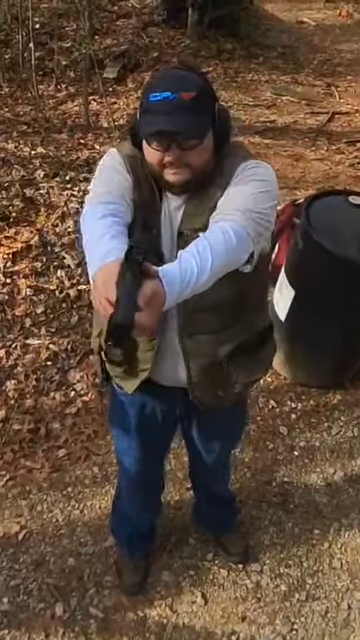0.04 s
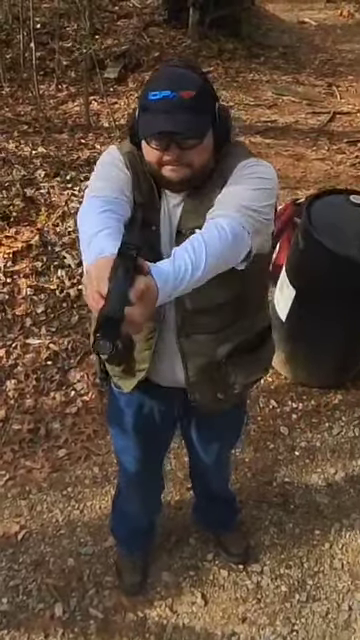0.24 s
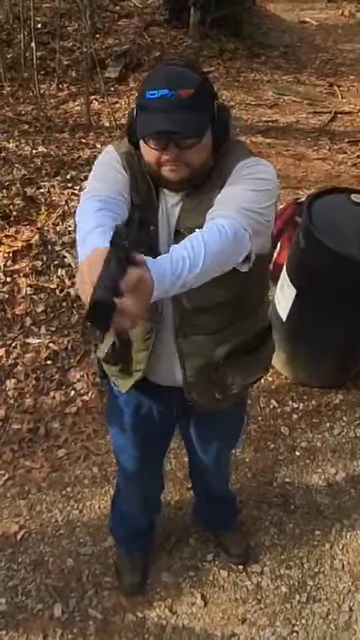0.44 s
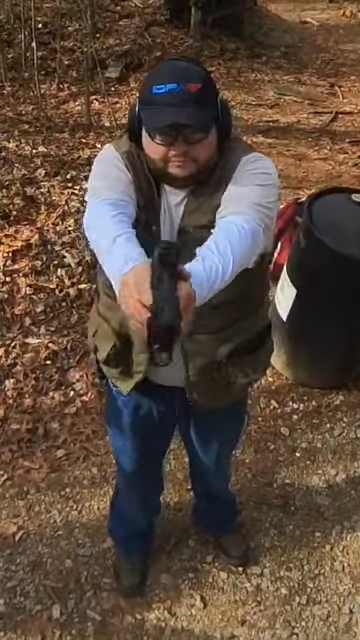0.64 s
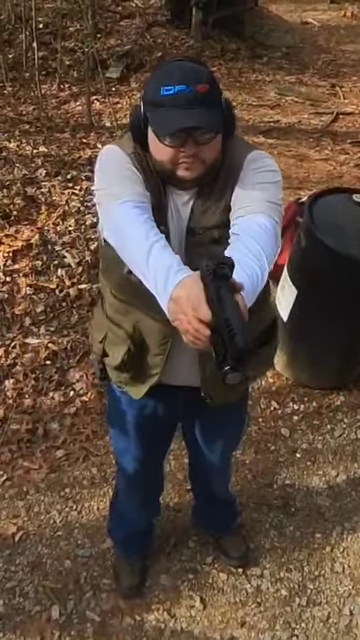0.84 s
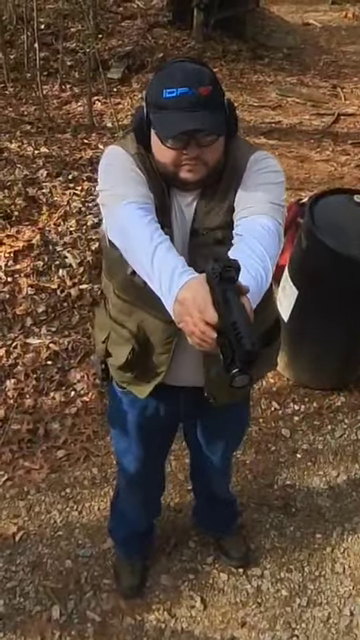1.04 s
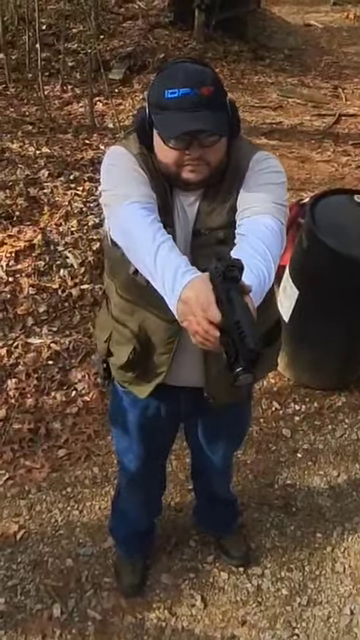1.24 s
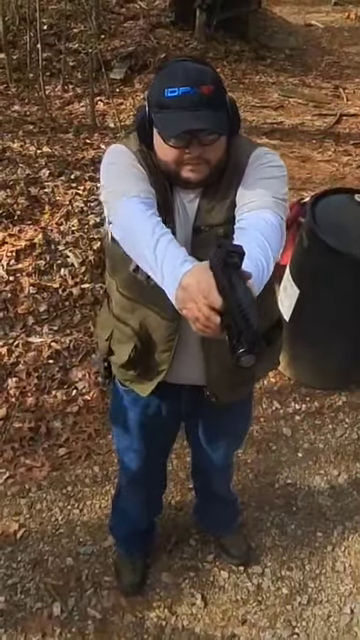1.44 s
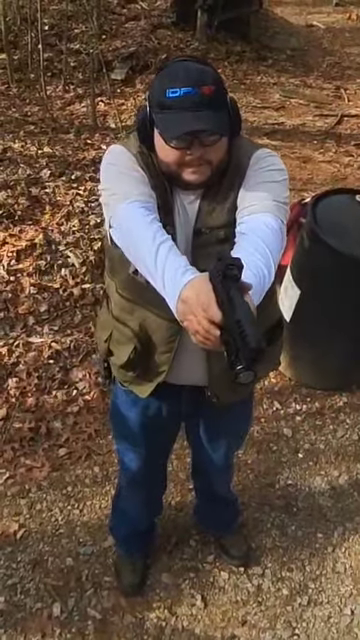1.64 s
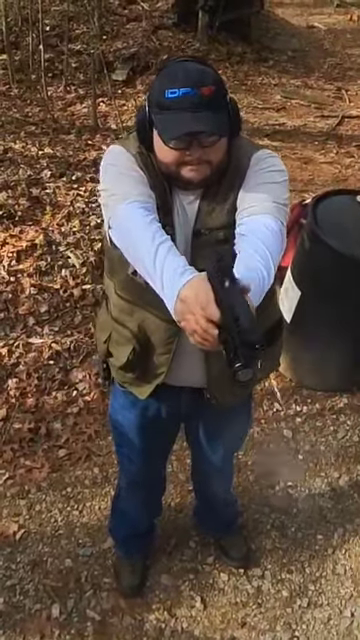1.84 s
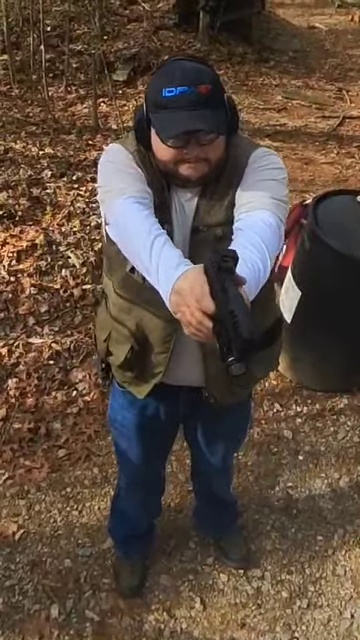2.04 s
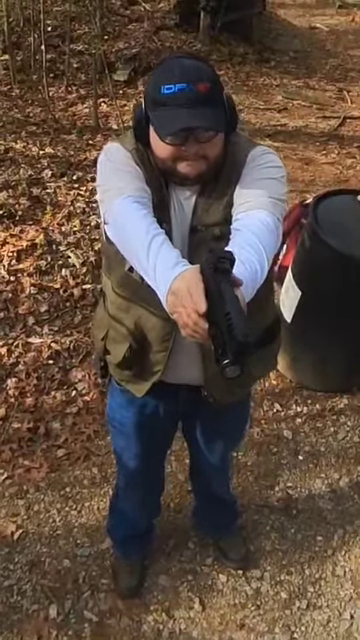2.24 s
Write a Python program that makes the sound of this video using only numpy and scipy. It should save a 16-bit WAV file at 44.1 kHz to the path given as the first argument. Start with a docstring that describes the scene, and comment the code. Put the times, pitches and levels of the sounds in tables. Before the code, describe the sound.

Four close handgun shots in a wood clearing, two quick, then two more after a pause; each a clipped double knock, a dip to near silence, then a low roar from the trees, with faint ticks.

```python
"""A wood clearing, where four handgun shots go off close to a small camera whose input each blast swamps. With
each shot come two knocks about 20 ms apart: sharp bumps that start a low, dying ring, amid faint pips and
snaps. The background drops away to a gap of near silence, then the roar scattered back by the trees comes in,
made of tinted noise with a boom and a bright hiss. Faint ticks, louder on one side, are short bursts of noise
with fainter, longer tails. Faint outdoor air, also tinted noise, lies underneath."""
import sys
import numpy as np
from scipy import signal
from scipy.fft import rfft, irfft
from scipy.io import wavfile
from scipy.ndimage import uniform_filter1d

SR = 44100
rng = np.random.default_rng(int(sys.argv[2]) if len(sys.argv) > 2 else 0)


def store_pcm(level_fs):
    """Save levels as 16-bit WAV."""
    pcm = np.round(np.clip(level_fs, -1, 1) * 32767).astype(np.int16)
    wavfile.write(sys.argv[1], SR, np.atleast_2d(pcm).T)


def invert_db(level):
    """Linear amplitude ratio for a level in decibels (20 dB per decade), elementwise."""
    return 10 ** (np.asarray(level, dtype=float) / 20)


N = 101429
T = np.arange(N) / SR  # time of every sample, s

# Tint of the outdoor air: f/Hz, relative level/dB
AIR_TINT = [(12, -33), (20, -4.5), (54, 2), (70, 3), (97, -8), (137, -5), (446, -15), (483, -15),
            (895, -15.5), (1570, -35), (7220, -40), (8700, -54.5), (12000, -51), (15600, -76),
            (22000, -120)]
# The four shots: t of the main knock/s, level of the echo's hiss/dB, time for the hiss to fall 60 dB/s
SHOTS = [(0.2612, -37, 0.41), (0.5648, -90, 0.19), (1.4858, -48.5, 0.23), (2.0166, -63, 0.14)]
# Faint pips around every shot: t after the main knock/s, level/dB, width/s
PIPS = [(-.04, -30, 0.00011), (.02, -30, 0.00017), (.0352, -21.5, 0.00029), (.0393, -33, 0.00013),
        (.0592, -41.5, .0002), (.076, -55, 0.00033)]
# Single knocks, two to a shot: t/s, knock level/dB, ring level/dB, crackle level/dB, whistle level/dB
KNOCKS = [(0.2404, -0.5, -4.5, -19, -25), (0.2606, 0.5, -3, -16.5, -49), (0.544, -13.5, 5.5, -50, -46),
          (0.5637, 1.5, 0.5, -48.5, -47), (1.466, -5.5, 2, -38, -43), (1.486, -0.3, 0.5, -21, -51.5),
          (1.9969, -7, 1, -37.5, -45), (2.0166, -0.5, 0, -37.5, -48.5)]
# Two ring tones that start downwards, as suction: f/Hz, level/dB, time to fall 60 dB/s
SUCTION_TONES = [(44, -9.3, .095), (180, -5, .035)]
# The ring tone that starts upwards: f/Hz, level/dB, time to fall 60 dB/s
PUNCH_TONE = (152, 6.7, .0168)
# The last faint ring tone: f/Hz, level/dB, time to fall 60 dB/s
LINGERING_TONE = (190, -23, 0.11)
# Lower and upper edge of the crackle: f/Hz
CRACKLE_BAND = (1900, 13100)
# Thin snaps: t/s, level/dB
SNAPS = [(0.2484, -30.5), (0.5503, -31), (1.4681, -14.5), (1.9982, -22.5), (0.289, -39.5), (.6083, -52),
         (1.4763, -58.5), (1.495, -48), (1.5103, -47.5), (1.5288, -46.5), (2.0248, -49), (2.0386, -55),
         (2.0595, -62.5)]
# Tint of the roar from the trees: f/Hz, relative level/dB
ROAR_TINT = [(15, -38), (25, -65), (43, -47), (70, -35.5), (102, -14.5), (133, -23.5), (324, -3.5),
             (678, -1.5), (1190, -5), (1730, -20.5), (2050, -19), (4190, -33.5), (9000, -64.5),
             (11700, -89), (19800, -120)]
# Loudness of the roar, one list for each shot: t/s, level/dB
ROAR_LEVELS = [
    [(0.395, -25.5), (0.423, -26), (0.431, -26), (0.54, -27)],
    [(0.705, -26.5), (0.749, -29), (1.297, -26.5), (1.311, -28.5), (1.451, -29), (1.46, -37.5)],
    [(1.62, -28), (1.676, -35), (1.686, -30.5), (1.832, -31), (1.836, -29), (1.99, -28)],
    [(2.15, -26.5), (2.208, -34.5), (2.214, -32), (2.3, -29.5)],
]
# Tint of the echo's boom: f/Hz, relative level/dB
BOOM_TINT = [(12, -40), (20, 7.5), (81, -0.5), (109, -8.5), (163, -1), (300, -12), (390, -46), (660, -120)]
# Tint of the echo's bright hiss: f/Hz, relative level/dB
HISS_TINT = [(800, -23), (1500, -8), (3000, 2), (6000, -3.5), (11500, -8), (14000, -7), (16000, -41)]
# Faint ticks, louder on one side: t/s, level/dB, middle f/Hz, tail level against the tick/dB
TICKS = [(0.8668, -40, 4630, -17), (0.8976, -36, 4200, -27), (0.949, -29.5, 4030, -30),
         (0.9563, -51, 5000, -35), (1.0087, -32, 3800, -31), (1.048, -37, 5730, -32),
         (1.0765, -34.5, 4350, -32), (1.109, -48, 11100, -24), (1.332, -48, 11000, -14),
         (1.451, -45.5, 10670, -0.5), (1.746, -37.5, 4300, -20), (1.818, -37.5, 4200, -34),
         (1.859, -39, 4630, -35), (2.228, -40, 4860, -35), (2.28, -44, 5000, -31),
         (2.287, -30.5, 3880, -29)]

# The background stays shut for SHUT_S after each main knock, then takes OPEN_S to come back
SHUT_S, OPEN_S = 0.093, 0.038


def coloured(points):
    """Noise of rms 1, tinted by scaling its frequencies to follow (Hz, dB) points."""
    hz, db = np.array(points, float).T
    f = np.fft.rfftfreq(N, 1 / SR) + 1  # 1 Hz up, so the logarithm works at zero
    tint = invert_db(np.interp(np.log(f), np.log(hz), db, -120, -120))
    x = irfft(rfft(rng.standard_normal(N)) * tint, N)
    return x / x.std()


def bell(at, width, shape=2):
    """Smooth bump around a moment, more pointed for a smaller shape."""
    return np.exp(-np.abs((T - at) / width) ** shape / 2)


def decay(at, t60):
    """Sudden start, then an exponential fall of 60 dB in t60 seconds."""
    return (T >= at) * invert_db(-60 * np.clip(T - at, 0, 9) / t60)


def spread(x, other):
    """Two channels: x in both, plus the treble of other, added left and taken away right."""
    treble = signal.butter(8, 2900, "high", fs=SR, output="sos")
    side = signal.sosfilt(treble, other)
    return np.array([x + side, x - side])


def air():
    """Outdoor air: steady tinted noise that stays fainter once the shooting starts."""
    level_db, after_db, wide_db = -57.5, -7, -7.5
    level = invert_db(level_db + after_db * (T > SHOTS[0][0]))
    return level * spread(coloured(AIR_TINT), invert_db(wide_db) * coloured(AIR_TINT))


def pips():
    """Pips: tiny downward bumps just before and after each main knock."""
    out = 0
    for at, *_ in SHOTS:
        for late, db, width in PIPS:
            out = out - invert_db(db) * bell(at + late, width, 1.23)
    return out


def ring(at, ring_db):
    """Low ring of a knock: dying tones that begin together, some upwards and some downwards."""
    lead_s, rise_s, settle_s = 0.00043, 0.00026, 0.003
    age = T - at + lead_s

    def tone(hz, db, t60):
        return invert_db(db - 60 * np.abs(age) / t60) * np.cos(2 * np.pi * hz * age)

    # The ring's own level is reached gradually; the second suction tone gets it twice over
    settle = invert_db(ring_db * np.clip(age / settle_s, 0, 1))
    upwards = tone(*PUNCH_TONE) + tone(*LINGERING_TONE)
    downwards = tone(*SUCTION_TONES[0]) + settle * tone(*SUCTION_TONES[1])
    onset = 0.5 + 0.5 * np.tanh(age / rise_s)
    return onset * settle * (upwards - downwards)


def knocks():
    """Knocks: each a short hump with a sharp hollow cut into it, and the low ring it starts."""
    hump_s, hump_db = 0.0014, -16.7
    fall_s, rise_s, hollow_db, hollow_shape = 0.00017, 0.000175, 1.6, 1.6
    deeper = 0.1  # dB more hollow for each dB less ring
    out = 0
    for at, db, ring_db, *_ in KNOCKS:
        hump = invert_db(hump_db) * bell(at, hump_s)
        hollow_width = np.where(T < at, fall_s, rise_s)
        hollow = invert_db(hollow_db - deeper * ring_db) * bell(at, hollow_width, hollow_shape)
        out = out + invert_db(db) * (hump - hollow + ring(at, ring_db))
    return out


def whistles():
    """Brief thin whistle after each knock: one tone, roughened by noise on its loudness."""
    hz, rough, rough_hz = 1433, 0.33, 510
    length_s, edge_s = 0.035, 0.019  # the fade-out fills the last edge_s
    waver = 1 + rough * coloured([(1, 0), (rough_hz, 0)])
    out = 0
    for at, _, _, _, db in KNOCKS:
        held = np.clip((at + length_s - T) / edge_s, 0, 1) * (T > at)
        out = out + invert_db(db) * held * waver * np.cos(2 * np.pi * hz * (T - at))
    return out


def crackle():
    """Crackle on each knock: a tiny burst of bright noise together with a sharp dip."""
    burst_s, dip_s, dip_db, wide_db = 0.0004, 0.00005, 3.5, -26
    band = signal.butter(1, CRACKLE_BAND, "band", fs=SR, output="sos")
    grit = signal.sosfilt(band, rng.standard_normal((2, N)))
    burst = dip = 0
    for at, _, _, db, _ in KNOCKS:
        burst = burst + invert_db(db) * bell(at, burst_s)
        dip = dip + invert_db(db + dip_db) * bell(at, dip_s)
    return spread(burst * grit[0] - dip, invert_db(wide_db) * burst * grit[1])


def snaps():
    """Thin snaps: each swings down, flips upwards at once and dies away."""
    snap_s = 0.00025
    out = 0
    for at, db in SNAPS:
        out = out + invert_db(db) * np.sign(T - at) * np.exp(-np.abs(T - at) / snap_s)
    return out


def gap():
    """Gain on all background sound: down to nothing at each shot, back up a moment later."""
    fade_s, fade_power, reopen_db, climb = 0.021, 2, -51.5, 0.62
    gain = 1
    for at, *_ in SHOTS:
        closing = np.clip((at - T) / fade_s, 0, 1) ** fade_power  # ends at the main knock
        back = np.clip((T - at - SHUT_S) / OPEN_S, 0, 1)
        opening = (back > 0) * invert_db(reopen_db * (1 - back) ** climb)
        gain = gain * np.maximum(closing, opening)
    return gain


def echo():
    """Blast scattered back by the trees: flickering noise, plus a boom and a hiss that die first."""
    flicker_db, flicker_hz = 1.5, 26.07  # spread of the random levels before smoothing, and their rate
    boom_db, boom_t60_s, boom_hold_s = -30, 0.086, 0.022
    wide_roar_db, wide_hiss_db, wide_late_s = -15, -2, 0.037

    s, db = np.concatenate(ROAR_LEVELS).T
    k = int(SR / flicker_hz)
    steps = np.repeat(rng.standard_normal(N // k + 1), k)
    flicker = uniform_filter1d(steps, k)[:N]
    roar = invert_db(np.interp(T, s, db) + flicker_db * flicker) * (T > SHOTS[0][0])

    def held_fall(at, hold, t60):
        """Full level until the gap is open again and a hold is over, then a fall."""
        age = T - at - SHUT_S - OPEN_S - hold
        return (T > at) * invert_db(-60 * np.clip(age, 0, 9) / t60)

    boom = invert_db(boom_db) * sum(held_fall(at, boom_hold_s, boom_t60_s) for at, *_ in SHOTS)
    hiss = sum(invert_db(db) * held_fall(at, 0, t60) for at, db, t60 in SHOTS)
    middle = roar * coloured(ROAR_TINT) + hiss * coloured(HISS_TINT) + boom * coloured(BOOM_TINT)
    wide_roar = invert_db(wide_roar_db) * roar * coloured(ROAR_TINT)
    wide_hiss = invert_db(wide_hiss_db) * hiss * coloured(HISS_TINT)
    widen = np.roll(gap(), int(wide_late_s * SR))  # the echo widens a little after it returns
    return spread(middle, widen * (wide_roar + wide_hiss))


def faint_ticks():
    """Faint ticks: short bursts of band noise leaning to one side, each with a tail."""
    tick_t60_s, tail_t60_s, width, wide_db = 0.003, 0.13, 0.42, -5
    out = 0
    for at, db, hz, tail_db in TICKS:
        edges = [hz / (1 + width), hz * (1 + width)]
        band = signal.butter(4, edges, "band", fs=SR, output="sos")
        fall = decay(at, tick_t60_s) + invert_db(tail_db) * decay(at, tail_t60_s)
        out = out + invert_db(db) * signal.sosfilt(band, rng.standard_normal(N) * fall)
    return spread(out, invert_db(wide_db) * out)  # the same sound in the side leans it to the left


def scene():
    """The shots on top of a background that the gap silences."""
    background = air() + echo() + faint_ticks()
    centred = pips() + knocks() + whistles() + snaps()  # one signal, alike in both channels
    return centred + crackle() + gap() * background


def roll_off(x):
    """The treble ends steeply here."""
    return signal.sosfilt(signal.butter(12, 16660, fs=SR, output="sos"), x)


def record(dry):
    """Cuts the top treble steeply: first filtering forwards and backwards without delay, then through one more
    steep low-pass that delays slightly."""
    low_pass = signal.ellip(8, 0.2, 60, 16600, fs=SR, output="sos")
    mix = signal.sosfiltfilt(low_pass, dry)
    return roll_off(mix)


dry = scene()
out = record(dry)
store_pcm(out)
```